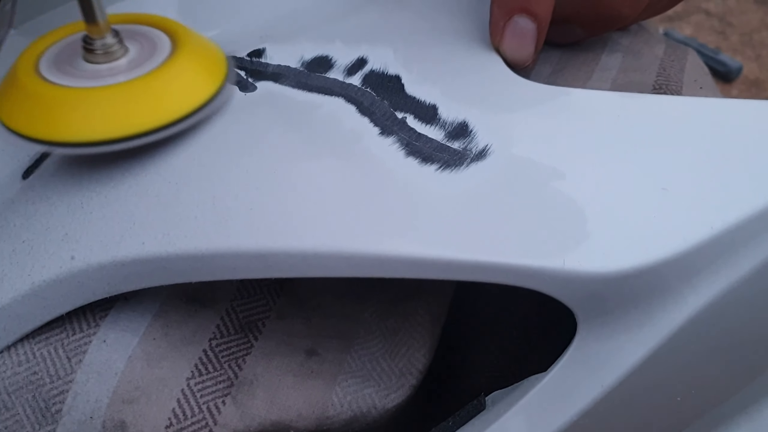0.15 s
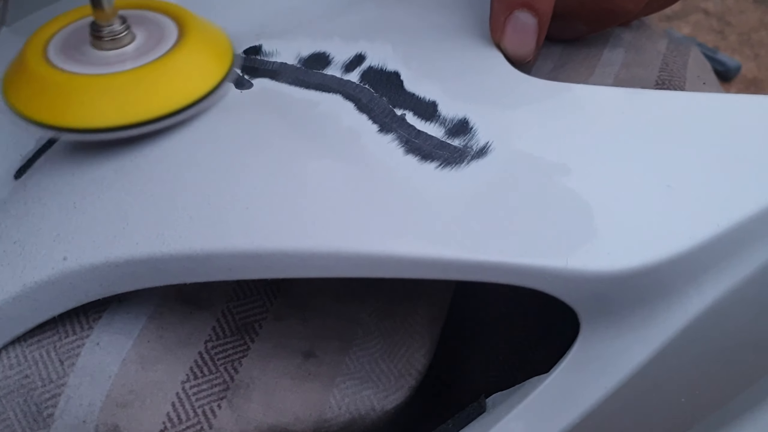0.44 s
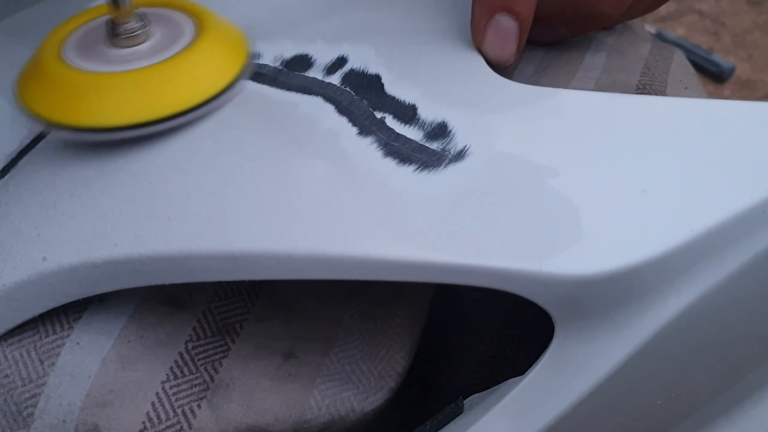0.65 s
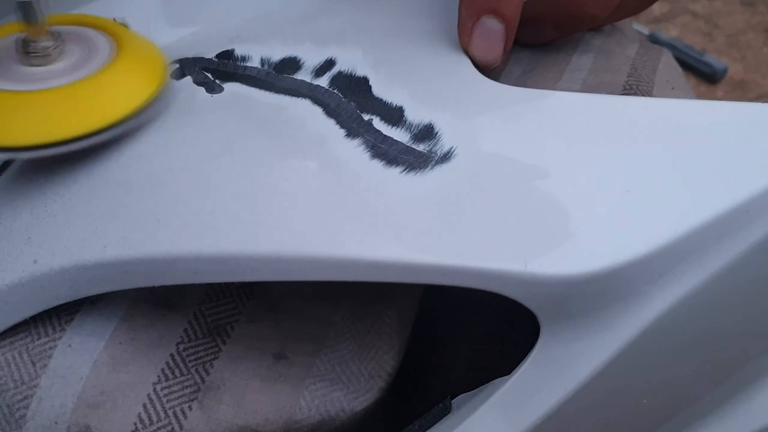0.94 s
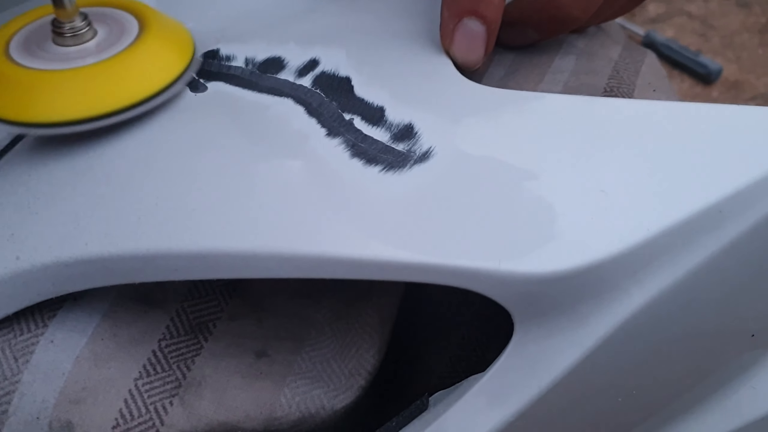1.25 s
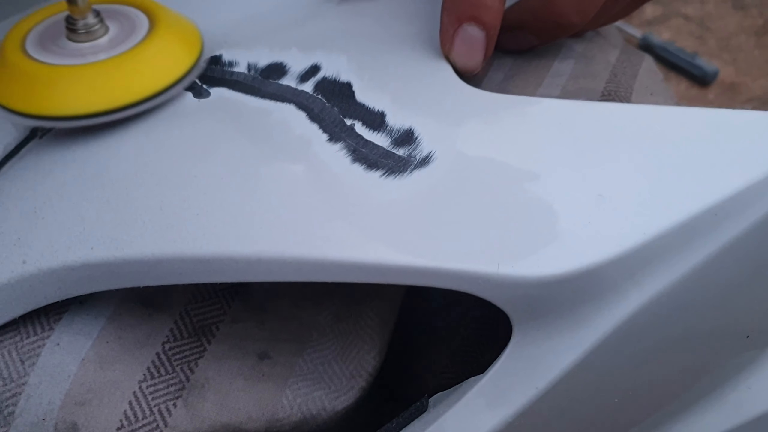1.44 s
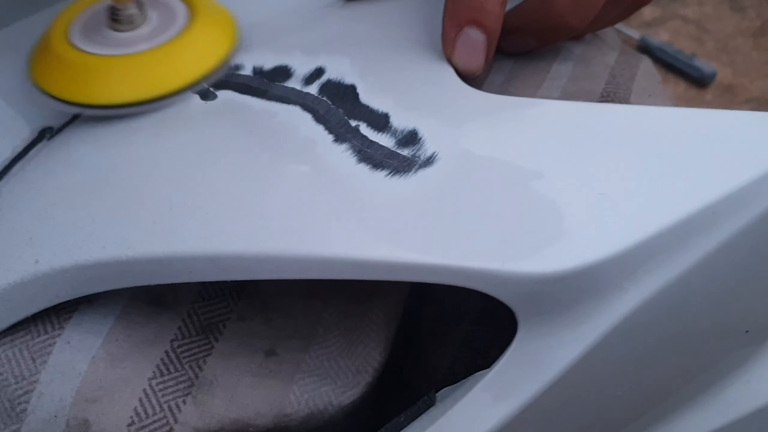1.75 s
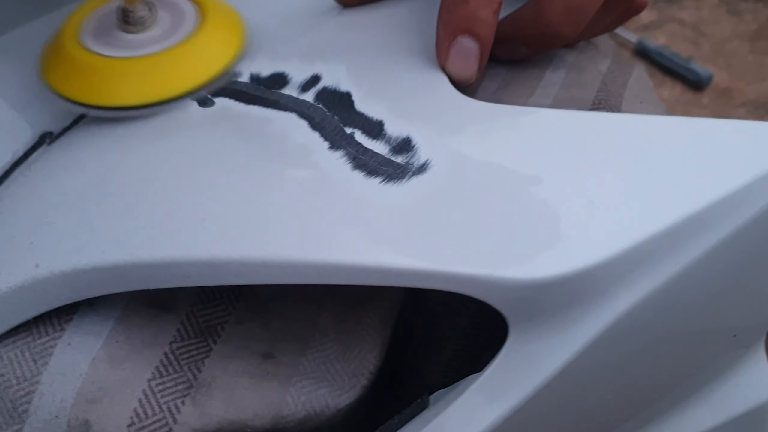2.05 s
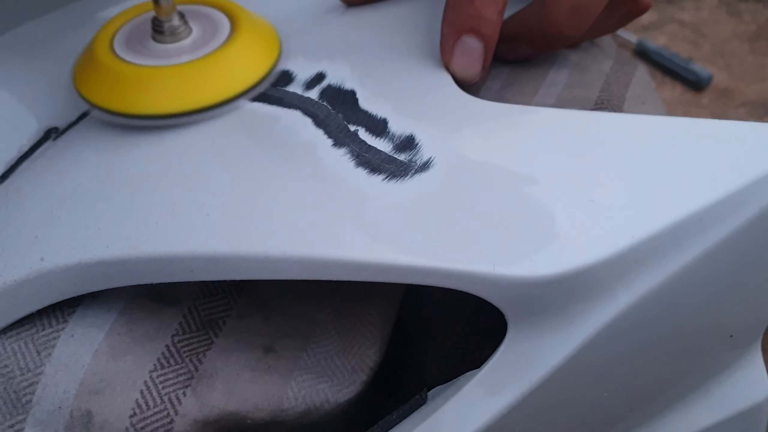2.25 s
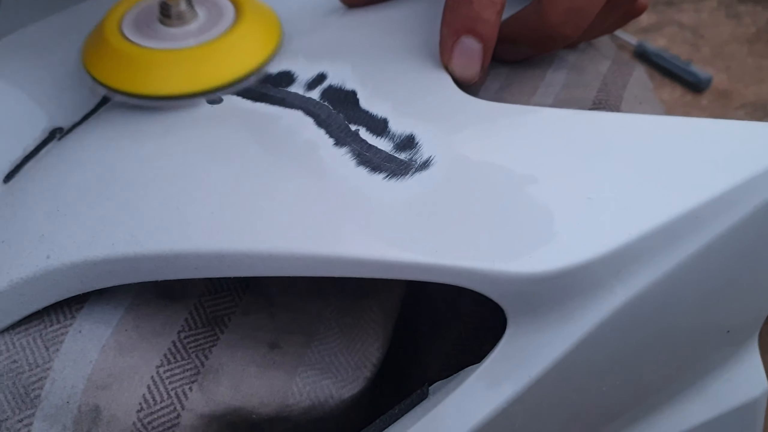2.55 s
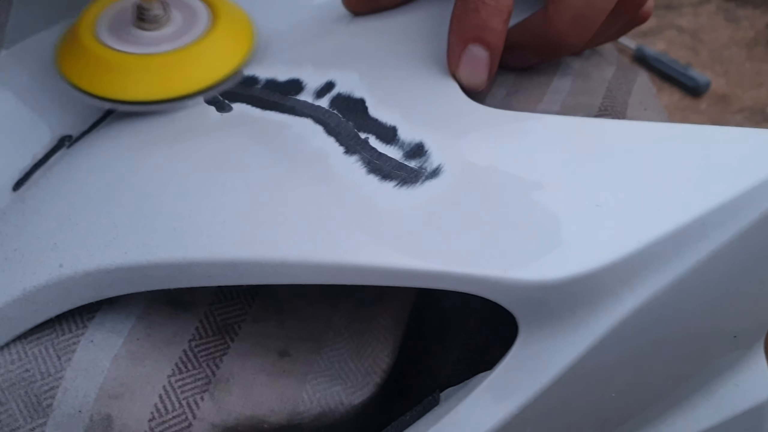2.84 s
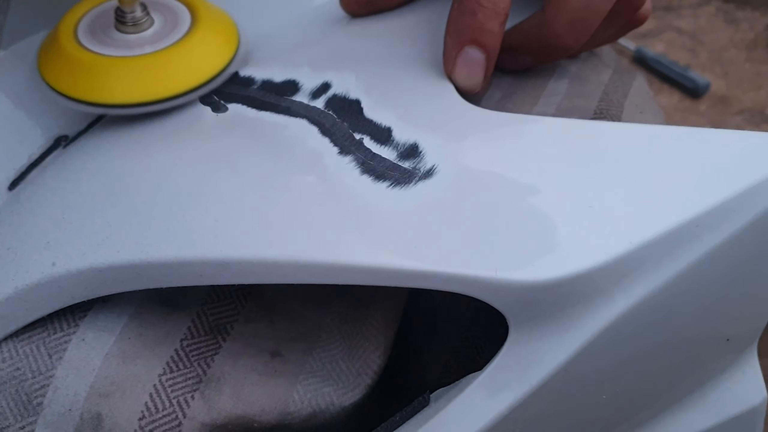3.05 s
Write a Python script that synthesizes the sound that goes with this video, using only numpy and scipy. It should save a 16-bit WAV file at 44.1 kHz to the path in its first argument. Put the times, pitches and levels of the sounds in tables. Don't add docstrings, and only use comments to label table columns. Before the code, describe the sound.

A small power sander whirs and rasps on a plastic panel, its pitch sagging under load

```python
import sys
import numpy as np
from scipy import signal
from scipy.fft import rfft, irfft
from scipy.io import wavfile
from scipy.ndimage import uniform_filter1d, map_coordinates

SR = 44100
rng = np.random.default_rng(int(sys.argv[2]) if len(sys.argv) > 2 else 0)


def store_wav(level_fs):
    pcm = np.round(np.clip(np.atleast_2d(level_fs), -1, 1) * 32767)
    wavfile.write(sys.argv[1], SR, pcm.T.astype(np.int16))


def rack_gain(trim_db):
    fader = np.asarray(trim_db, float)
    return 10 ** (fader / 20)


N = 141120
TIME_S = np.arange(N) / SR
BIN_HZ = np.fft.rfftfreq(N, 1 / SR)


def unit_rms(x):
    return x / np.sqrt(np.mean(x ** 2) + 1e-20)


def read_db(spectrum, hz):
    point_hz, level_db = np.transpose(spectrum)
    return np.interp(np.log(hz + 1), np.log(point_hz + 1), level_db)


def colour(x, spectrum):
    return irfft(rfft(x) * rack_gain(read_db(spectrum, BIN_HZ)), N)


def slow(count, per_s):
    knots = rng.standard_normal((count, 400))
    coarse = np.arange(0, N, 64)
    rows = [map_coordinates(k, [coarse / SR * per_s], order=3) for k in knots]
    return np.array([np.interp(np.arange(N), coarse, row) for row in rows])


def hiss(grain_db, size):
    grain = np.repeat(np.minimum(rng.exponential(1, N // size + 1), 4), size)[:N]
    return rng.standard_normal((3, N)) * rack_gain(grain_db * grain)


def shaft_orders(turns, orders, wander_db):
    lag_rad, phase_wander_rad = 0.95, 0.1
    drift = slow(count=2 * len(orders), per_s=13.0)
    lag = lag_rad * rng.standard_normal(len(orders)) * [k > 1 for k, _ in orders]
    total = 0
    for i, (k, level_db) in enumerate(orders):
        level = rack_gain(level_db + wander_db * min(k / 3, 1) * drift[2 * i])
        phase = 2 * np.pi * k * turns + lag[i]
        total = total + level * np.cos(phase + phase_wander_rad * np.sqrt(k) * drift[2 * i + 1])
    return total


def garage(near):
    t60_s, wait_s, level_db, density = 0.12, 0.0045, -10, 0.12
    t = np.arange(SR // 3) / SR
    taps = rng.choice([-1.0, 1.0], (2, len(t))) * (rng.random((2, len(t))) < density)
    taps = taps * rack_gain(-60 * t / t60_s) * (t > wait_s)
    taps = taps / np.linalg.norm(taps, axis=1, keepdims=True)
    return rack_gain(level_db) * signal.fftconvolve(near, taps, axes=1)[:, :N]


# freq_hz, level_db
RUMBLE_SPECTRUM = [(25, -30), (60, -5), (90, 4.5), (200, -6.5), (400, -27)]
# start_s, level_db
PANEL_BUMPS = [(.02, -54), (.13, -61), (0.339, -47), (.57, -48), (.895, -46), (1.71, -44), (1.76, -58),
               (1.939, -45), (2.06, -42.5), (2.27, -50), (2.79, -57)]


def bumps():
    rumble_db, bump_s, bump_hz = -61.5, 0.009, 62
    level_db = rumble_db - 0.83 * (TIME_S - 2.3) + 1.1 * slow(count=1, per_s=6.9)
    out = rack_gain(level_db) * unit_rms(colour(rng.standard_normal((3, N)), RUMBLE_SPECTRUM))
    for start_s, bump_db in PANEL_BUMPS:
        u = np.maximum(TIME_S - start_s, 0)
        envelope = np.e * u / bump_s * np.exp(-u / bump_s)
        out += rack_gain(bump_db) * envelope * np.sin(2 * np.pi * bump_hz * u)
    return out


# time_s, speed_hz
SHAFT_SPEED = [
    [(0.0, 138.6), (0.12, 146.5), (0.21, 150.5), (0.324, 154.7), (0.366, 150), (0.508, 131), (0.724, 114.5),
     (0.82, 117.3)],
    [(0.85, 126.6), (0.944, 123.7), (0.972, 121.3), (1.114, 135.3), (1.226, 142.1), (1.244, 140.3),
     (1.524, 156.6), (1.56, 155.9)],
    [(1.6, 156.1), (1.706, 161.1), (1.826, 148.5), (2.032, 137.7), (2.064, 132.8), (2.09, 127.6),
     (2.144, 123.7), (2.22, 121.8)],
    [(2.26, 122.2), (2.338, 125.4), (2.382, 120.4), (2.436, 121.6), (2.496, 126.2), (2.596, 127.1),
     (2.652, 120.0), (2.7, 119)],
    [(2.74, 120.9), (2.784, 123.9), (2.808, 118.9), (2.848, 119.6), (2.876, 117.4), (2.92, 117.5),
     (3.136, 136.7), (3.2, 141.2)],
]


def shaft():
    speed_hz = np.interp(TIME_S, *np.transpose(sum(SHAFT_SPEED, [])))
    return speed_hz, 0.0995 + np.cumsum(speed_hz) / SR


# freq_hz, level_db
FAN_SPECTRUM = [(300, -20), (900, -12.5), (2200, -6), (2900, -4), (4500, 1), (8500, -8.5), (11000, -5),
                (16000, -8)]
# order (multiple of shaft speed), level_db
HUM_ORDERS = [(1, 1), (2, -12), (3, -8.5), (4, -16), (5, -11), (6, -12), (7, -7), (8, -8.5), (9, -12),
              (10, -10), (11, -9), (12, -3), (13, 4), (14, -26), (15, -11), (16, 1), (17, -1), (18, 3)]


def motor(speed_hz, turns):
    fan_db, fan_wander_db, hum_db, speed_power, drift_db_per_s = -38.5, 0.5, -54.5, 2.34, -0.93
    level = (speed_hz / 150) ** speed_power * rack_gain(drift_db_per_s * TIME_S)
    beat = 1 + 0.093 * np.cos(2 * np.pi * turns)
    fan = unit_rms(colour(hiss(grain_db=-0.6, size=8), FAN_SPECTRUM)) * beat
    fan = fan * rack_gain(fan_db + fan_wander_db * slow(count=1, per_s=12.0))
    hum = rack_gain(hum_db) * shaft_orders(turns, HUM_ORDERS, wander_db=3.5)
    return level * (fan + hum)


# time_s, bite_db, slap_db, ring_db, rub_db (re bite)
DAB_TOUCHES = [
    [(0.22, -58, -66, -64, 10), (0.25, -31, -39, -30.5, 0.5), (0.3, -34.5, -53, -48, 1.5),
     (0.328, -26.5, -40.5, -39, -8), (0.382, -21.5, -35, -40.5, -7), (0.52, -32.5, -47, -40.5, 5.5)],
    [(0.56, -23.5, -44.5, -37, -6), (0.638, -21, -42, -36.5, -10.5), (0.778, -31.5, -48.5, -36.5, 0),
     (0.808, -44.5, -57, -41, 6), (0.82, -55, -50, -68, -2)],
    [(0.86, -44, -61, -71, 5), (0.866, -36, -61, -34.5, -3), (0.892, -21.5, -40, -46, -5.5),
     (0.96, -25.5, -47, -33.5, -6), (1.0, -64, -59, -50, 18)],
    [(1.22, -59, -73, -80, -1), (1.232, -23.5, -42.5, -29, -10.5), (1.258, -36, -41, -63, 8),
     (1.275, -68, -77, -35, 1)],
]
STROKE_TOUCHES = [
    [(1.55, -40.5, -62, -53, -4), (1.58, -27.5, -44, -39, -4.5), (1.684, -36, -62, -45.5, -3),
     (1.69, -34.5, -52, -40.5, 9)],
    [(1.72, -21, -38.5, -47, -9), (1.824, -26.5, -45.5, -35, -4), (1.872, -35, -52, -35.5, 5),
     (1.938, -26.5, -42.5, -36.5, -1.5), (2.04, -19, -46.5, -45.5, -16), (2.19, -37, -60.5, -36.5, 4)],
    [(2.23, -33, -55, -40.5, -4), (2.252, -27.5, -54.5, -42, -8), (2.358, -24.5, -49, -40.5, -14.5),
     (2.404, -37, -57.5, -38, 5), (2.47, -47, -67, -40.5, 4)],
]
LAST_TOUCHES = [
    [(2.5, -31.5, -54, -40, -6), (2.57, -24, -48, -40.5, -16.5), (2.632, -31, -50.5, -40.5, -4.5),
     (2.684, -40, -58, -39, 6), (2.762, -33, -52, -44, -7)],
    [(2.775, -24, -49, -45, -14.5), (2.821, -19.5, -50, -47, -16), (2.919, -37.5, -57, -35, 0),
     (2.941, -43.5, -80, -33, 7), (2.97, -70, -96, -60, 5)],
]


def contact():
    gains = np.zeros((4, N))
    dabs = [DAB_TOUCHES[0] + DAB_TOUCHES[1], DAB_TOUCHES[2], DAB_TOUCHES[3]]
    for touch in dabs + [sum(STROKE_TOUCHES + LAST_TOUCHES, [])]:
        time_s, bite_db, slap_db, ring_db, rub_db = np.transpose(sorted(touch))
        down = (TIME_S > time_s[0]) * (TIME_S < time_s[-1])
        for row, level_db in enumerate((bite_db, slap_db, ring_db, bite_db + rub_db)):
            gains[row] += rack_gain(np.interp(TIME_S, time_s, level_db)) * down
    return uniform_filter1d(gains, size=250, axis=1)


# freq_hz, level_db
RUB_SPECTRUM = [(300, -22.5), (1000, -17.5), (2000, -14.5), (3000, -10), (5000, -3), (8200, -10),
                (11000, -2), (15500, -8)]


def drag(turns):
    swell = 1 + 0.37 * np.cos(2 * np.pi * turns)
    wander = rack_gain(2.0 * slow(count=1, per_s=30.0))
    return unit_rms(colour(hiss(grain_db=3.0, size=3) * wander * swell, RUB_SPECTRUM))


# freq_hz, level_db
GRIT_SPECTRUM = [(1500, -22.5), (4000, -26), (5600, -11.5), (8000, -16), (10000, -3.5), (12500, -4.5),
                 (14800, 0), (16000, -9.5)]


def scrape(turns, luck):
    width_turns, jitter_turns, width_db, turn_db, colour_db = 0.117, 0.035, 0.61, 1.6, 2
    place = (turns + 0.5) % 1 - 0.5 - jitter_turns * luck[0]
    width = width_turns * np.where(place > 0, 1.3, 0.9) * rack_gain(width_db * luck[1])
    burst = np.exp(-0.5 * (place / width) ** 2) * rack_gain(turn_db * luck[2])
    spectrum = rfft(colour(hiss(grain_db=1.5, size=8) * burst, GRIT_SPECTRUM))
    total = 0
    for mid_hz, chance in zip((2000, 6000, 10500, 15000), luck[3:7]):
        band = irfft(spectrum * np.exp(-0.5 * ((BIN_HZ - mid_hz) / 2000) ** 2), N)
        total = total + band * uniform_filter1d(rack_gain(colour_db * chance), size=60)
    return unit_rms(total)


# freq_hz, level_db
SLAP_SPECTRUM = [(110, 9.5), (250, 18), (310, 11), (450, 12.5), (600, 3.5), (900, -23)]
RING_SPECTRUM = [(500, -21), (750, -11), (1000, -8), (1400, -7), (1800, -6), (2300, -2), (3000, 2),
                 (4800, -7)]
# time_s, peak_hz, lift_db, thump_db (once a turn), treble_db
PANEL_SPOTS = [(.24, 1240, -2, -3, -10), (.3, 790, 22, -1, -3.5), (.38, 970, -0.5, -6, 7.5),
               (.47, 1440, 13, 2.5, 2), (.56, 1550, 1.5, 3, 2), (.63, 1000, 0, 3, -11.5),
               (.75, 1450, 0, 5, -8), (.93, 1580, -2, -1.5, -8), (1.25, 1304, 5, -3, 0),
               (1.57, 949.7, 14.5, -6, 2.5), (1.66, 960, 16, 4, 0), (1.759, 1006, 11, -10, -9),
               (1.81, 1520, 7.5, -6, -0.5), (1.9, 1348, 9.5, 2, 0.5), (1.98, 1290, 6.5, -10, -4.5),
               (2.06, 1000, 11, -4, -4.5), (2.15, 1493, 7.5, 14, -0.5), (2.3, 1299, 4, -4.5, -8.5),
               (2.39, 1501, 6, 7, -5), (2.47, 1230, 3, -3, -8.5), (2.57, 1306, 5, -2, -3.5),
               (2.65, 1249, 5.5, 9, -3.5), (2.73, 1520, 6.5, -6, -7), (2.8, 1095, 8.5, 3, -2),
               (2.88, 1161, 4, 7, -5.5), (2.95, 1711, 3, 4, -16.5)]


def panel(speed_hz, turns):
    peak_octaves, treble_hz = 0.4, 2300
    time_s, *spot = np.transpose(PANEL_SPOTS)
    peak_hz, lift_db, thump_db, treble_db = (np.interp(TIME_S, time_s, v) for v in spot)
    thud = [(k, read_db(SLAP_SPECTRUM, k * speed_hz) + thump_db * (k == 1)) for k in range(1, 5)]
    tone = []
    for k in range(4, 36):
        octaves_off = np.log2(k * speed_hz / peak_hz)
        peak_db = lift_db * np.exp(-0.5 * (octaves_off / peak_octaves) ** 2)
        shelf_db = treble_db / (1 + (treble_hz / (k * speed_hz)) ** 6)
        tone.append((k, read_db(RING_SPECTRUM, k * speed_hz) + peak_db + shelf_db))
    slap = shaft_orders(turns, thud, wander_db=2.5)
    ring = shaft_orders(turns - 0.03, tone, wander_db=2.8)
    return unit_rms(slap), unit_rms(ring)


def pad(speed_hz, turns):
    bite_gain, slap_gain, ring_gain, rub_gain = contact()
    luck = rng.standard_normal((600, 8))[np.floor(turns + 0.5).astype(int)].T
    uneven = uniform_filter1d(rack_gain(1.0 * luck[7]), size=120)
    slap, ring = panel(speed_hz, turns)
    grit = bite_gain * scrape(turns, luck) + rub_gain * drag(turns)
    return grit + uneven * (slap_gain * slap + ring_gain * ring)


# freq_hz, lead_rad
PORT_LEAD = [(0, .3), (300, .45), (1210, 1.4), (2400, 2.4), (3300, 4.3), (8180, 8), (11300, 8), (16400, 19)]
# freq_hz, tilt_db
PORT_TILT = [(40, -9), (90, -4), (200, 1.5), (1000, -1), (2200, 4), (4500, -11), (8000, 0), (12000, -7)]
# freq_hz, share_db
PORT_SCATTER = [(40, 27), (90, 0.5), (170, -8.5), (700, -2.5), (2000, 8), (4500, 13), (9000, -9),
                (14000, 10.5)]


def ports(sources):
    pan_db_per_s = -1.3
    side = np.array([[0.5], [-0.5]])
    x = rfft(sources)
    share = rack_gain(read_db(PORT_SCATTER, BIN_HZ))
    mixed = (x[0] + share * x[1:]) / np.sqrt(1 + share ** 2)
    mixed = mixed * np.exp(1j * side * np.interp(BIN_HZ, *np.transpose(PORT_LEAD)))
    near = irfft(mixed * rack_gain(side * read_db(PORT_TILT, BIN_HZ)), N)
    return near * rack_gain(side * pan_db_per_s * (TIME_S - 4.5))


def scene():
    speed_hz, turns = shaft()
    near = ports(bumps() + motor(speed_hz, turns) + pad(speed_hz, turns))
    return near + garage(near)


def roll_off(x):
    return signal.sosfilt(signal.butter(12, 16820, fs=SR, output="sos"), x)


def record(dry):
    limit, edge_hz = 1.4, 15950
    soft = limit * np.tanh(dry / limit)
    lowpass = signal.firwin(901, edge_hz, window=("kaiser", 8), fs=SR)
    mix = signal.oaconvolve(soft, lowpass[None], "same")
    return roll_off(mix)


dry = scene()
out = record(dry)
store_wav(out)
```